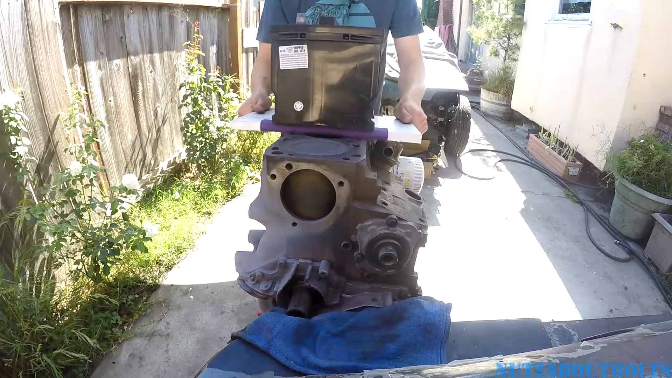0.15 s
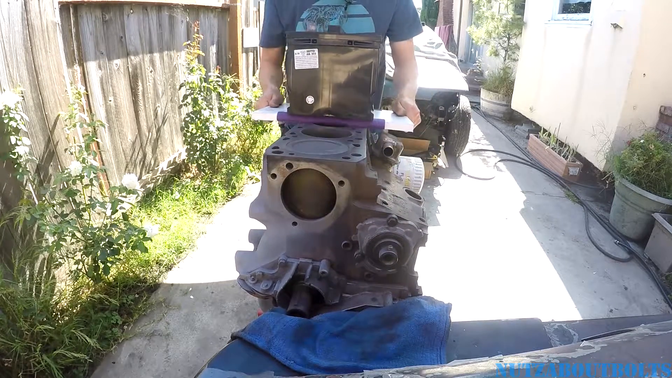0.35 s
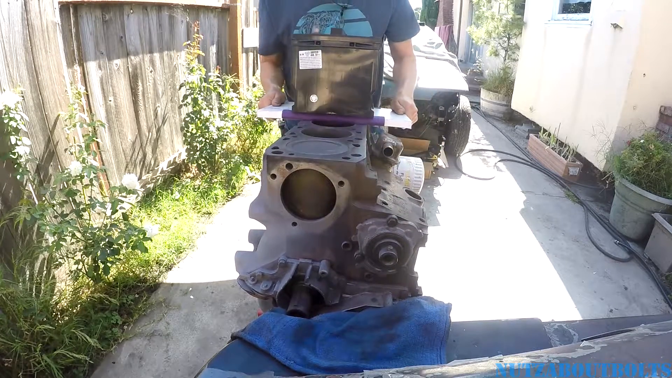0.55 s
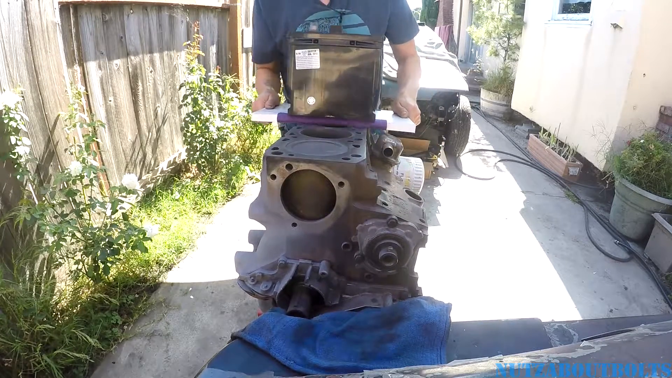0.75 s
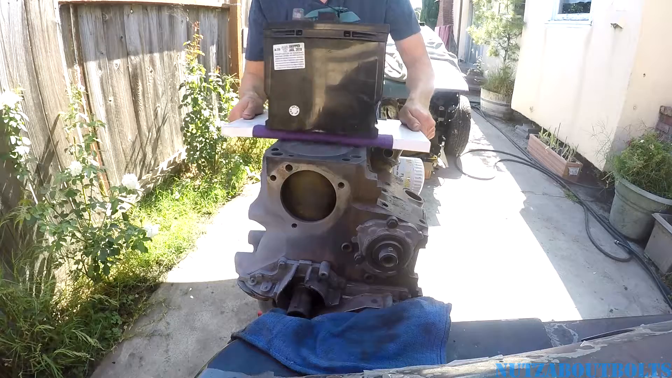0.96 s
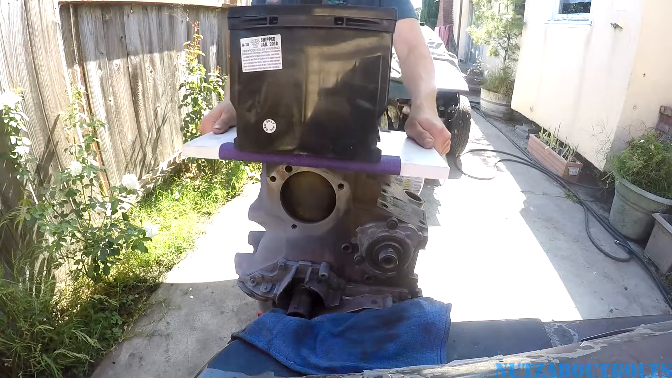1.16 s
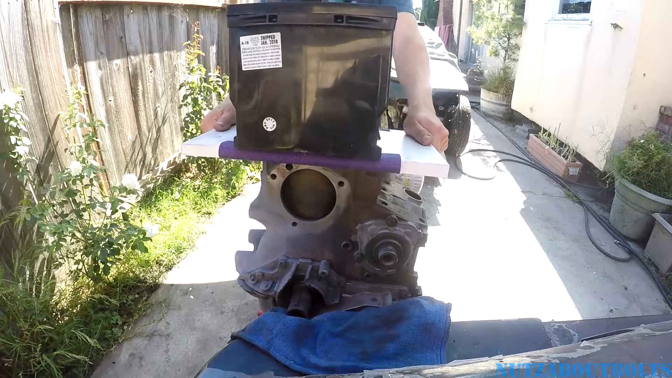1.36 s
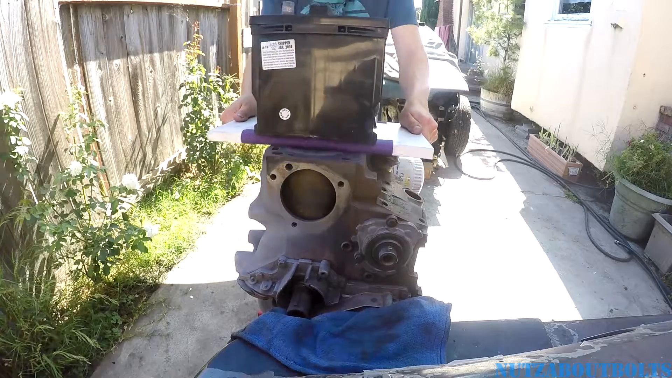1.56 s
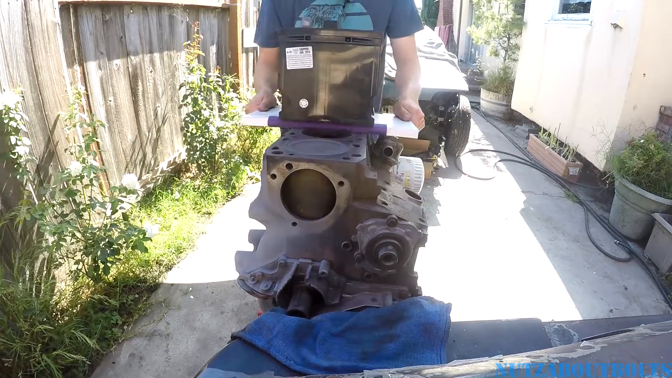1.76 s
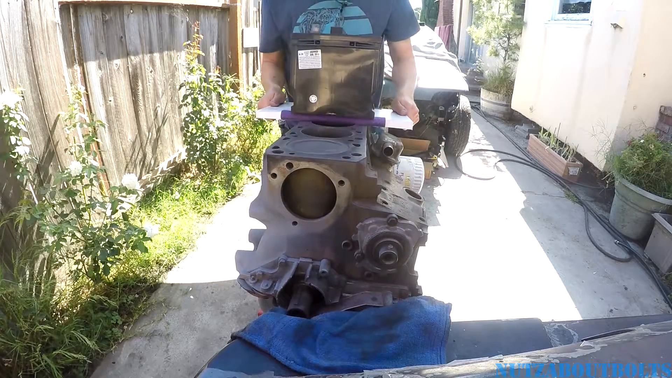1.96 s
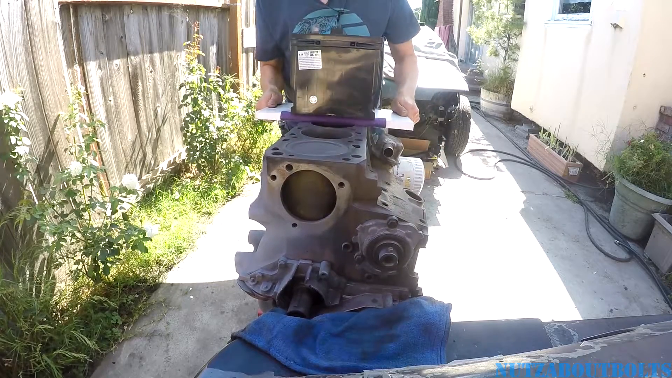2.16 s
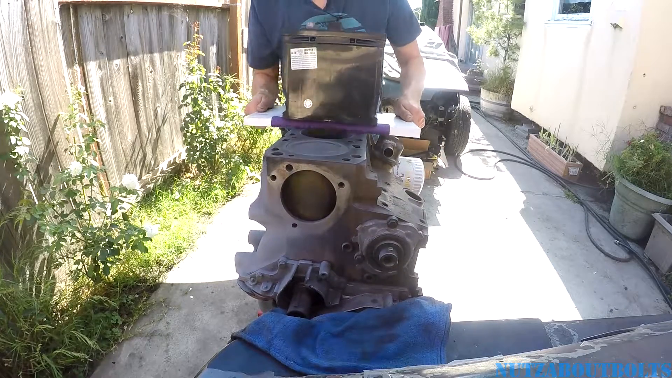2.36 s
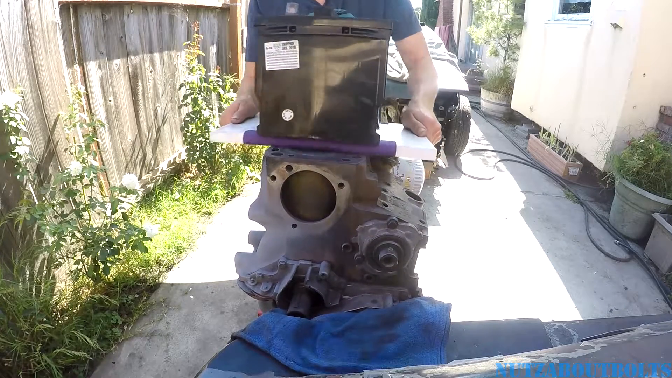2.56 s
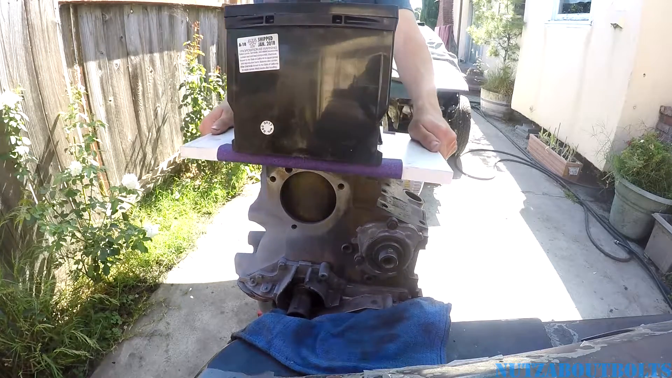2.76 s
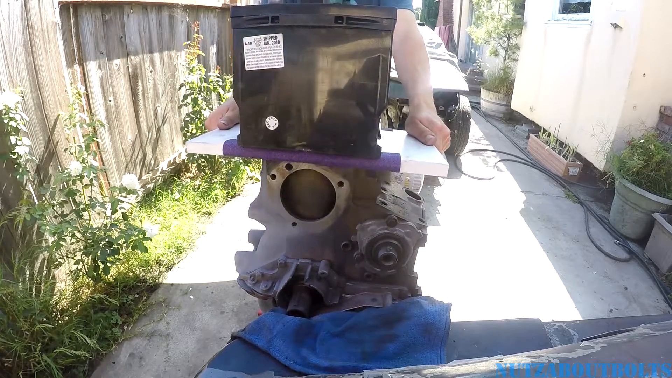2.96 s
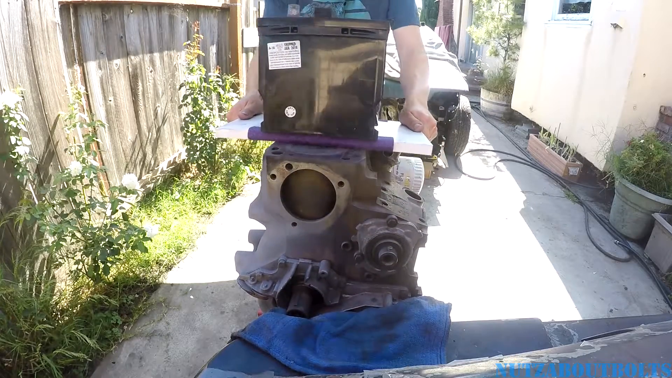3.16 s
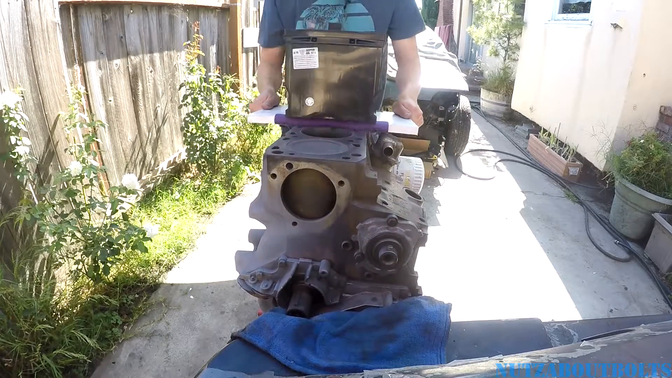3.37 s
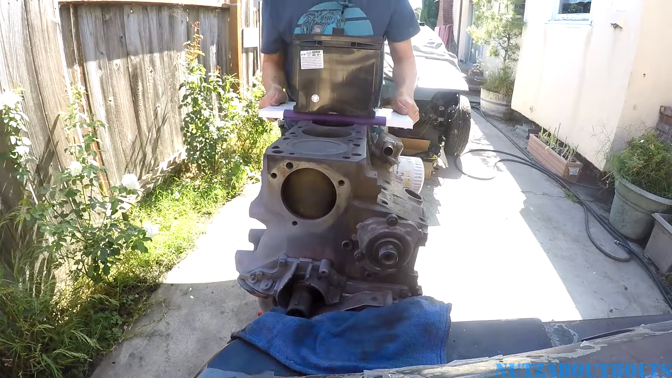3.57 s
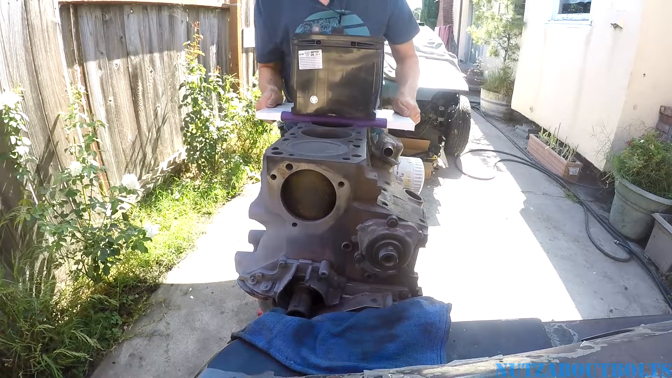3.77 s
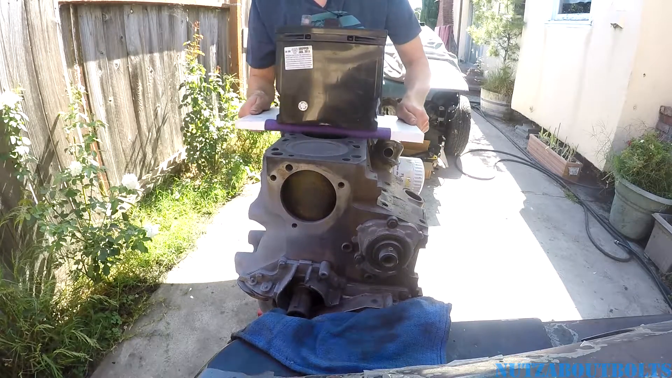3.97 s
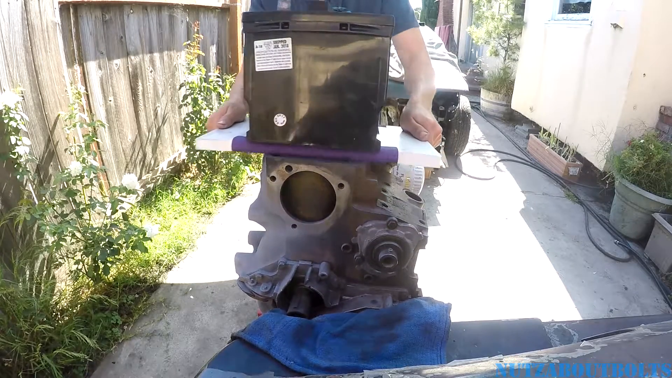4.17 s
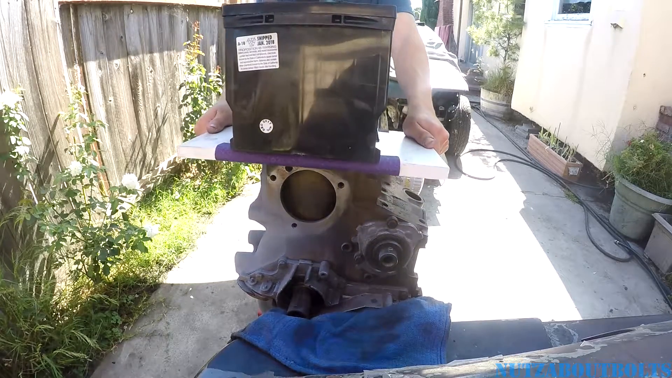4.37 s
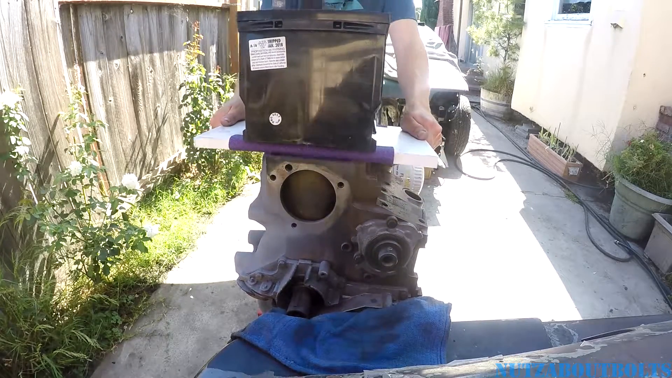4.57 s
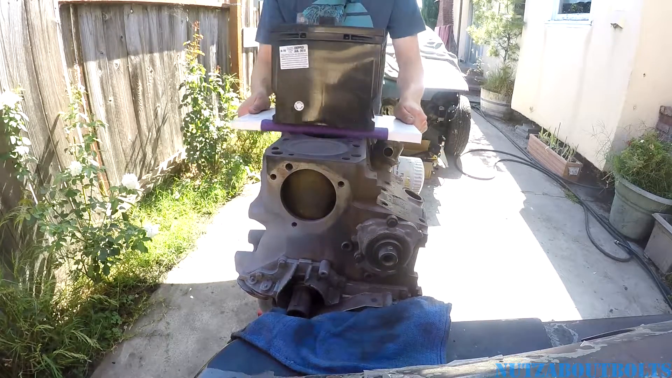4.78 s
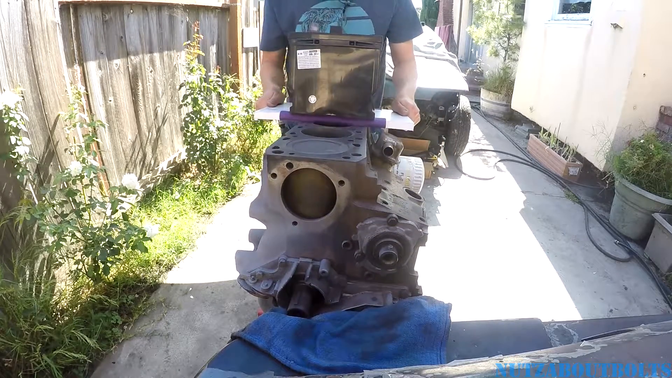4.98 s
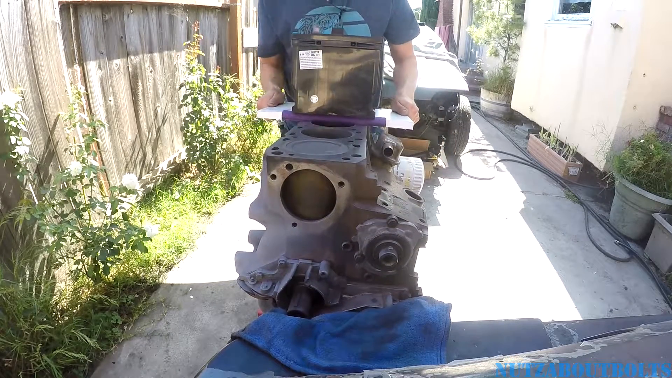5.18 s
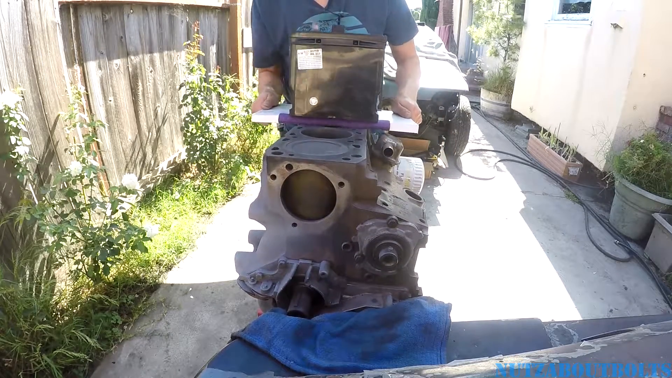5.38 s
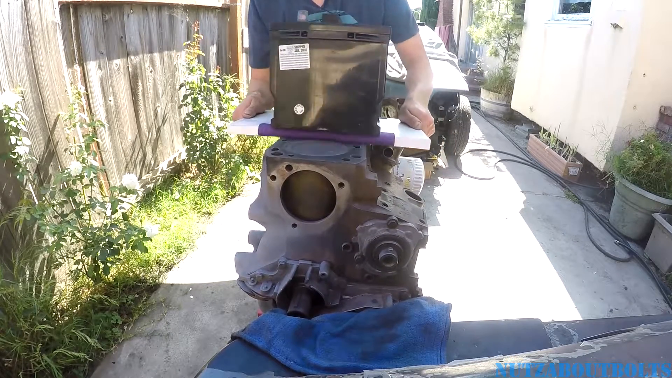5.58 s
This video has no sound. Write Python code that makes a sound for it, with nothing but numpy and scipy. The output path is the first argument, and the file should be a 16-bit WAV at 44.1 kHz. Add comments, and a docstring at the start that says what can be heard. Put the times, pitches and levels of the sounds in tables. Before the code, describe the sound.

Close, dry and centred, a sandpaper-faced board under a heavy load is worked over an iron engine block in a yard. The opening pull hisses until about 0.55 s. Pushes toward the microphone follow at 0.6-1.25, 2.1-2.8, 3.7-4.35 and 5.2 s to the end; pulls away fill 1.35-2.05, 2.9-3.6 and 4.4-5.1 s. Each push builds a tight rasp and a brief rising chatter, breaking free near 0.93, 2.48, 4.02 and 5.58 s, then slides on. Dull woody knocks follow at 1.0, 2.6 and 4.15 s, the first rattling. Pulls are brighter and harsher, growing until the grit catches twice near 1.75, 3.3 and 4.8 s, then easing, with softer knocks. Tiny grain snaps tick around the turns, clearest at 2.8 and 5.3 s. Short gaps reveal a soft outdoor rush with low rumble, swelling slightly around 2.7 s, and a faint short reflection.

```python
"""Sanding an engine block by hand

A sandpaper-faced board, weighted by a battery, is pushed and pulled over an engine block in a side yard.
Random grain impacts, filtered, make the hiss, the rasp and the hollow of the bores; decaying sines make
the judder before the paper breaks free and the knocks of the rocking load; noise bursts make grain snaps.
A fence and a wall answer faintly over a soft outdoor rush. Both channels are alike.
"""
import sys
import numpy as np
from scipy import signal
from scipy.fft import rfft, irfft, next_fast_len
from scipy.io import wavfile
from scipy.ndimage import map_coordinates

SR = 44100
rng = np.random.default_rng(int(sys.argv[2]) if len(sys.argv) > 2 else 0)


def store_pcm(level_fs):
    """Save levels as 16-bit WAV."""
    pcm = np.round(np.clip(level_fs, -1, 1) * 32767).astype(np.int16)
    wavfile.write(sys.argv[1], SR, np.atleast_2d(pcm).T)


N = 248283


def amp(db):
    """Decibels to gain."""
    return 10 ** (np.asarray(db) / 20)


def unit(x):
    """Scaled to rms 1."""
    return x / np.sqrt(np.mean(x ** 2) + 1e-20)


def curves(rows):
    """One value per sample for each column after the time."""
    time_s, *columns = np.transpose(rows)
    return [np.interp(np.arange(N) / SR, time_s, column) for column in columns]


def wobble(knots_per_s):
    """Smooth random curve."""
    knots = rng.standard_normal(int(N * knots_per_s / SR) + 4)
    return map_coordinates(knots, [np.arange(N) * knots_per_s / SR])


def coloured(x, points):
    """Causal minimum-phase filter of unit energy, shaped by (Hz, dB) points."""
    size = 4096
    hz, db = np.transpose(points)
    bin_hz = np.fft.rfftfreq(size, 1 / SR)
    gain = amp(np.interp(np.log(bin_hz + 1), np.log(hz), db))
    # folding the cepstrum gives minimum phase
    cepstrum = irfft(np.log(np.maximum(gain, 1e-6)))
    cepstrum[1:size // 2] *= 2
    cepstrum[size // 2 + 1:] = 0
    response = irfft(np.exp(rfft(cepstrum)))
    return signal.fftconvolve(x, response / np.linalg.norm(response))[:len(x)]


def add(track, time_s, sound):
    """Mixes a sound into the track at a time."""
    part = track[max(round(time_s * SR), 0):][:len(sound)]
    part += sound[:len(part)]


def grains(rate_per_s, spread_db):
    """Random tiny impacts of uneven size, at rms 1."""
    chance = np.clip(rate_per_s / SR, 1e-3, 1)
    sizes = rng.standard_normal(N) * amp(spread_db * rng.standard_normal(N))
    hits = rng.random(N) < chance
    return unit(hits * sizes / np.sqrt(chance))  # denser hits are not louder


def scrape(colours, rate_per_s, spread_db):
    """Grains through (power share, spectrum) pairs that fade into each other."""
    total = np.zeros(N)
    for share, points in colours:
        layer = unit(coloured(grains(rate_per_s, spread_db), points))
        total += np.sqrt(np.clip(share, 0, 1)) * layer
    return total


# grit on iron, board far, pushed near, pulled near, dragging hard: (frequency [Hz], density [dB per Hz])
GRIT_FAR = [(2000, -40), (3400, -8.5), (4680, -3.5), (5330, -1), (6110, -3), (7040, 1.5), (7980, 0),
            (9090, -3.5), (10700, -13.5), (14000, -42)]
GRIT_PUSH = [(1880, -48), (3200, -22), (3600, -10), (4880, -8), (8900, 4), (10900, -5.5), (13700, -33),
             (15500, -54)]
GRIT_PULL = [(2060, -26), (3500, -9), (3940, -4), (4870, 1), (6250, -1.5), (7620, 2), (9240, 1),
             (11200, -8.5), (13900, -30.5), (15500, -39)]
GRIT_DRAG = [(2060, -25), (3500, -7.5), (4010, -8), (4810, 3), (5210, -2.5), (5800, 1), (6810, 0),
             (7300, 1.5), (8470, 1.5), (10300, -4.5), (15500, -55)]
# rasp of the board, far, near, dragging hard: (frequency [Hz], density [dB per Hz])
RASP_FAR = [(590, -37.5), (1000, -5), (1220, -2.5), (1450, -3), (1890, -2.5), (2310, 1.5), (2750, 0),
            (3300, -13.5), (3800, -18), (4940, -29), (8360, -120)]
RASP_NEAR = [(590, -29), (1000, -19.5), (1320, -7.5), (1610, -4.5), (2190, -1), (2660, -2), (2980, -3),
             (3460, -13), (3800, -15), (4940, -18), (8360, -120)]
RASP_DRAG = [(590, -27.5), (1000, -14.5), (1090, -29), (1150, -9), (1470, -9), (1920, -0.5), (2160, 2),
             (2510, -3), (2940, -3.5), (3800, -16), (4940, -45), (8360, -120)]
# air in the bores, open and covered by the board: (frequency [Hz], density [dB per Hz])
HOLLOW_OPEN = [(200, -22), (560, -15), (700, -8), (810, -0.5), (950, -6.5), (1150, -14), (1600, -50)]
HOLLOW_COVERED = [(200, -27.5), (350, -10), (560, -6), (665, 1), (760, 1), (1100, 0.5), (1600, -33.5)]


def sanding():
    """Grit strikes the iron, most densely in mid-stroke, and shakes the board and the air in the bores."""
    hiss_gain, rasp_gain = stroke_levels()
    place, near, pushing = motion()
    far, pulling = 1 - near, ~pushing
    rate_per_s = 5000 + 16000 * np.sin(np.pi * place)
    # late in the pull the board drags, then the grit bites
    drag = pulling * hump(place, .38, 0.17)
    bite = pulling * hump(place, .32, 0.087)

    hiss_colours = [
        (far * (1 - bite), GRIT_FAR),
        (near * pushing, GRIT_PUSH),
        (near * pulling * (1 - bite), GRIT_PULL),
        (bite, GRIT_DRAG),
    ]
    rasp_colours = [(far * (1 - drag), RASP_FAR), (near * (1 - drag), RASP_NEAR), (drag, RASP_DRAG)]
    hollow_colours = [(far, HOLLOW_OPEN), (near, HOLLOW_COVERED)]
    hiss = scrape(hiss_colours, rate_per_s, spread_db=-0.5)
    rasp = scrape(rasp_colours, rate_per_s * .7, spread_db=0.5)
    hollow = scrape(hollow_colours, rate_per_s / 2, spread_db=2.5)

    grip = wobble(knots_per_s=260)  # uneven grip and slide; deepest in the rasp while dragging
    surge = wobble(knots_per_s=28)  # uneven hand pressure
    hiss *= hiss_gain * amp(0.39 * grip + 0.42 * surge)
    rasp_flutter_db = (.5 + 0.49 * drag) * grip + 0.58 * wobble(knots_per_s=41) + .5 * surge
    rasp *= rasp_gain * amp(rasp_flutter_db)
    hollow *= rasp_gain ** 0.48 * amp(-28 + 3.74 * pushing)  # grows more slowly with effort
    return hiss + rasp + hollow


# ends of the strokes: (time [s], place [0 far from the microphone, 1 near])
TRAVEL = [(-.2, 0.84), (.59, 0), (1.31, 0.97), (2.09, 0.013), (2.85, 1), (3.65, 0.011), (4.39, 0.91),
          (5.18, 0.032), (5.93, 0.89)]


def motion():
    """Board place and nearness, each 0-1, and whether it moves toward the microphone."""
    place = np.clip(curves(TRAVEL)[0], 0, 1)
    near = .5 + .5 * np.tanh((place - .33) / 0.13)
    return place, near, np.gradient(place) > 0


def stroke_levels(creep_db=-60):
    """Gains of hiss and rasp over the strokes; the rasp keeps a creep level between them."""
    hiss_push = pushes(db=-32.5, attack_s=0.082, release_s=0.069, build_db=12.5, build_s=.25,
                       build_shape=1.0, slide_db=7.0, rock_db=3.5)
    hiss_pull = pulls(db=-24.5, attack_s=.085, release_s=0.097, lean_db_per_s=19, catch_db=4,
                      recatch_db=4.5, catch_s=0.026, lag_s=0.036, ease_db=-6, ease_s=0.11)
    rasp_push = pushes(db=-29, attack_s=0.069, release_s=0.054, build_db=9.5, build_s=0.16,
                       build_shape=0.9, slide_db=2.0, rock_db=-1.0)
    rasp_pull = pulls(db=-27, attack_s=0.065, release_s=0.091, lean_db_per_s=5.5, catch_db=6.5,
                      recatch_db=3.5, catch_s=0.037, lag_s=.002, ease_db=-2.0, ease_s=0.2)
    return hiss_push + hiss_pull, rasp_push + rasp_pull + amp(creep_db)


def hump(x, at, width):
    """Bell of height 1."""
    return np.exp(-((x - at) / width) ** 2)


def moving(t, start, stop, attack_s, release_s, attack_shape=1.43, release_shape=1.14):
    """Gain 0-1 of a stroke that gathers speed and slows to a halt."""
    gather = np.tanh(np.maximum(t - start, 0) / attack_s) ** attack_shape
    halt = np.tanh(np.maximum(stop - t, 0) / release_s) ** release_shape
    return gather * halt


# pushes toward the microphone:
# (start [s], paper breaks free [s], stop [s], relative effort [dB], relative judder level [dB])
PUSHES = [(.612, 0.934, 1.254, 0, -11), (2.133, 2.475, 2.792, 1.5, -8.5),
          (3.677, 4.016, 4.343, -0.16, -13.5), (5.233, 5.575, 5.92, -.7, -14.5)]


def pushes(db, attack_s, release_s, build_db, build_s, build_shape, slide_db, rock_db,
           let_go_s=0.0041, rock_after_s=0.11, rock_width_s=0.036):
    """Push gain: grip builds, the paper breaks free, the board slides on under the rocking load."""
    t, gain = np.arange(N) / SR, np.zeros(N)
    for start, free, stop, effort_db, _ in PUSHES:
        grip = np.clip(1 + (t - free) / build_s, 0, 1) ** build_shape
        freed = np.clip((t - free) / let_go_s, 0, 1)
        rock = rock_db * hump(t, free + rock_after_s, rock_width_s)
        press_db = (1 - freed) * build_db * grip + freed * slide_db + rock
        gain += moving(t, start, stop, attack_s, release_s) * amp(db + effort_db + press_db)
    return gain


# pulls away from the microphone:
# (start [s], board catches [s], stop [s], relative effort [dB], catch strength [0-1])
PULLS = [(-.2, 0.194, .555, -2.5, 0.54), (1.342, 1.753, 2.035, 0.5, 0.76), (2.895, 3.31, 3.608, 0.7, 0.8),
         (4.423, 4.825, 5.11, -.3, 0.82)]


def pulls(db, attack_s, release_s, lean_db_per_s, catch_db, recatch_db, catch_s, lag_s, ease_db, ease_s,
          recatch_after_s=0.092):
    """Pull gain: pressure grows, the board catches twice, then eases off toward the far end."""
    t, gain = np.arange(N) / SR, np.zeros(N)
    for start, catch, stop, effort_db, strength in PULLS:
        since = t - catch - lag_s
        recatch = catch + recatch_after_s
        lean = lean_db_per_s * np.minimum(since, 0)
        catches = catch_db * hump(since, 0, catch_s) + recatch_db * hump(t, recatch, catch_s)
        ease = ease_db * np.clip((t - recatch) / ease_s, 0, 1)
        press_db = lean + strength * catches + ease
        gain += moving(t, start, stop, attack_s, release_s) * amp(db + effort_db + press_db)
    return gain


# brief squeaks as the load rocks late in a push: (end [s], length [s], relative level [dB])
SQUEAKS = [(1.08, 0.064, -20.5), (2.578, 0.0097, -12.5), (4.161, 0.0076, -11)]
# crunch of a slip: (frequency [Hz], density [dB per Hz])
SLIP = [(400, -37), (1000, -70), (1700, 5), (2300, 13), (2800, -8), (3400, 1), (5500, -11), (8800, -14),
        (11000, -6), (15000, -59)]


def judders(slips_per_s=330, t60_s=0.012, rise_db=7, scatter=0.07, crunch_db=-7,
            build_s=.063, first_hz=1740, last_hz=2655, squeak_hz=2240):
    """Slips swell and stiffen, mean pitch climbing, until the paper breaks free; squeaks hold theirs."""
    rings, crunch, t = np.zeros(N), np.zeros(N), np.arange(SR // 50) / SR
    runs = [(free, build_s, db, first_hz, last_hz) for _, free, _, _, db in PUSHES]
    runs += [(end, length, db, squeak_hz, squeak_hz) for end, length, db in SQUEAKS]
    onset = 1 - np.exp(-t / 0.00078)
    for release, length, db, from_hz, to_hz in runs:
        count = max(round(length * slips_per_s), 1)
        leads_s = (np.arange(count) + rng.uniform(0.54, 1.2, count)) / slips_per_s
        for lead_s in leads_s:
            early = lead_s / length
            hz = (to_hz + (from_hz - to_hz) * early) * np.exp(scatter * rng.standard_normal())
            slip_db = db + 6.5 - rise_db * early + rng.normal(0, 0.61)
            envelope = amp(slip_db - 60 * t / t60_s) * onset
            add(rings, release - lead_s, envelope * np.sin(2 * np.pi * hz * t))
            add(crunch, release - lead_s, envelope * rng.standard_normal(len(t)))
    return rings + amp(crunch_db) * coloured(crunch, SLIP)


# the load rocks and lands: (time [s], relative level [dB], length of the rattle that follows [s])
KNOCKS = [(.036, -24, 0.019), (0.151, -27.5, 0), (1.006, -13, 0.125), (1.333, -37, 0.07),
          (1.588, -17, 0.019), (1.774, -28, 0.0065), (2.595, -13.5, 0.00056), (2.880, -31, 0.04),
          (3.135, -17, 0.01), (3.313, -21, 0), (4.148, -12.5, 0), (4.672, -19.5, 0.0093),
          (4.849, -22, 0.016)]
# modes of the loaded board: (frequency [Hz], relative level [dB], t60 [s])
LOAD_MODES = [(319, -5, 0.067), (359, 0.5, 0.035), (395, 3.5, 0.028), (489, -4.5, 0.089), (587, -1, 0.07),
              (613, -13, .035), (840, -4.5, 0.055), (1050, -8.5, 0.067)]


def knocks(bounce_s=0.00562, bounce_db=-9, rattles_per_s=230, rattle_db=-8, fade_db=-16,
           highpass_hz=230, soft_s=0.0011):
    """The load lands, bounces once and sometimes rattles to rest, ringing the board's modes."""
    track, t = np.zeros(N), np.arange(SR // 5) / SR
    hz, level_db, t60_s = np.transpose(LOAD_MODES)[:, :, None]
    onset = 1 - np.exp(-t / soft_s)
    modes = amp(level_db - 60 * t / t60_s) * np.sin(2 * np.pi * hz * t) * onset
    for time_s, db, rattle_s in KNOCKS:
        contacts = [(0, 0), (bounce_s * rng.uniform(0.92, 1.054), bounce_db)]
        count = round(rattle_s * rattles_per_s)
        for delay_s in (np.arange(count) + 2 + rng.random(count)) / rattles_per_s:
            contacts.append((delay_s, rattle_db + fade_db * (delay_s / rattle_s) ** 3))
        for delay_s, drop_db in contacts:
            # each contact shares its force differently among the modes
            mode_db = db + drop_db - 6 + rng.normal(0, 3.2, len(modes))
            add(track, time_s + delay_s, amp(mode_db) @ modes)
    # the board is too small to radiate bass
    return signal.sosfilt(signal.butter(2, highpass_hz, "highpass", fs=SR, output="sos"), track)


# single grains snap: (time [s], relative level [dB], pitch [Hz])
SNAPS = [(1.281, -31, 8900), (1.358, -40, 8500), (2.127, -37, 8000), (2.135, -30, 6500), (2.802, -34, 8980),
         (2.822, -19.5, 8600), (3.592, -35, 8500), (4.370, -32, 9300), (5.334, -22, 10800)]
# colour of a snap: (multiple of its pitch [1], density [dB per Hz])
SNAP_COLOUR = [(.12, -27), (.37, -3), (.6, -9), (1, 9), (1.22, -1), (1.45, -19), (1.8, -30)]


def snaps(t60_s=0.015):
    """A grain cracks under the board, mostly as it turns back: a decaying, tuned noise burst."""
    track, t = np.zeros(N), np.arange(SR // 30) / SR
    for time_s, db, hz in SNAPS:
        crack = amp(db - 7.5 - 60 * t / t60_s) * rng.standard_normal(len(t))
        add(track, time_s, coloured(crack, np.multiply(SNAP_COLOUR, [hz, 1])))
    return track


def yard(x, t60_s=0.21, first_s=0.0041, count=16):
    """Short, scattered answer of fence and wall: decaying noise tails that crossfade over time."""
    t, step = np.arange(SR // 4) / SR, np.linspace(0, count - 1, N)
    tails = rng.standard_normal((count, len(t))) * amp(-60 * t / t60_s) * (t > first_s)
    echo = np.zeros(N)
    for k, tail in enumerate(tails):
        share = np.clip(1 - abs(step - k), 0, 1)
        echo += signal.oaconvolve(x * np.sqrt(share), tail / np.linalg.norm(tail))[:N]
    return echo


# outdoor background: (frequency [Hz], density [dB per Hz])
AIR = [(15, -25), (30, -12), (55, 0.5), (100, -0.5), (200, -2.5), (370, -4.5), (560, -6), (900, -11.5),
       (1500, -13), (2500, -19), (3900, -38), (8600, -34.5), (12000, -53), (15500, -85)]
# low rumble of the background: (time [s], relative level [dB])
RUMBLE = [(0, -3), (1.7, -1), (2.7, 3), (3.6, -.5), (4.7, -1), (5.63, -0.5)]


def air(db=-41, split_hz=200):
    """Rush of the neighbourhood: wavering filtered noise whose low rumble swells slowly."""
    noise = unit(coloured(rng.standard_normal(N), AIR))
    rush = amp(db + 0.9 * wobble(knots_per_s=4.67)) * noise
    low = signal.sosfiltfilt(signal.butter(2, split_hz, fs=SR, output="sos"), rush)
    return rush - low + amp(curves(RUMBLE)[0]) * low


def scene():
    """Work, its echo and the background, alike in both channels."""
    work = sanding() + judders() + knocks() + snaps()
    mono = work + amp(-18) * yard(work) + air()
    return np.array([mono, mono])


def record(dry, top_hz=15700):
    """Removes everything from the band limit up."""
    size = next_fast_len(N + SR // 2)
    passed = np.fft.rfftfreq(size, 1 / SR) < top_hz
    return irfft(rfft(dry, size) * passed, size)[:, :N]


dry = scene()
out = record(dry)
store_pcm(out)
```